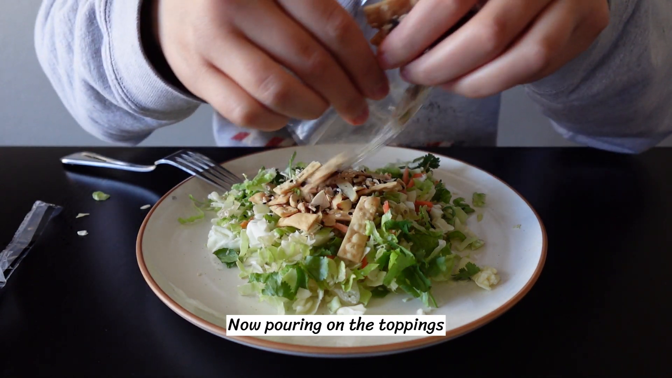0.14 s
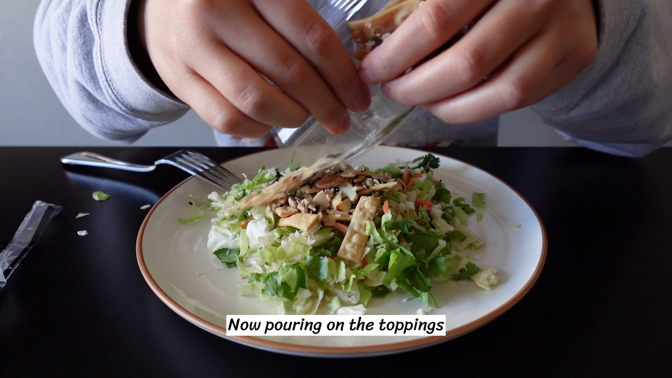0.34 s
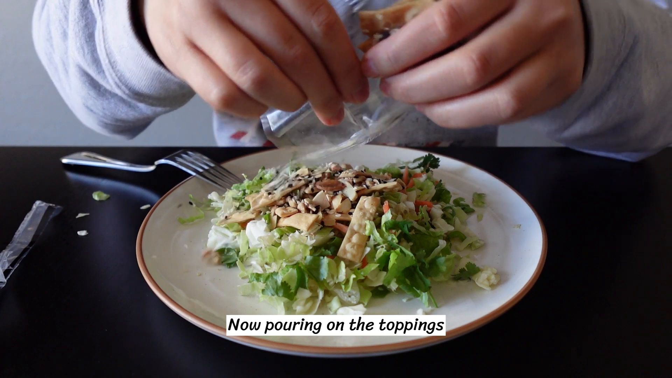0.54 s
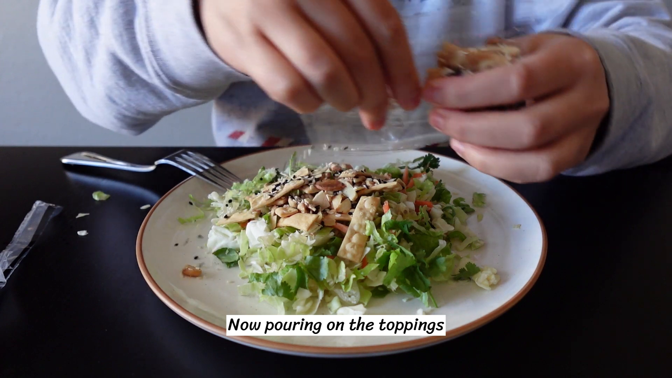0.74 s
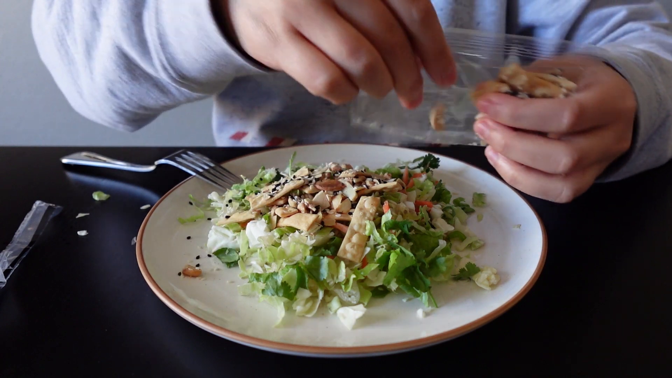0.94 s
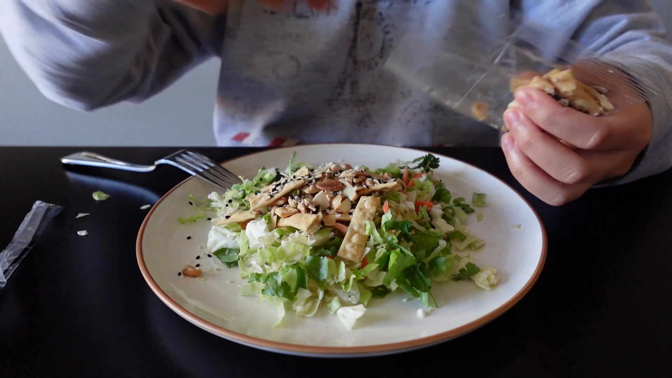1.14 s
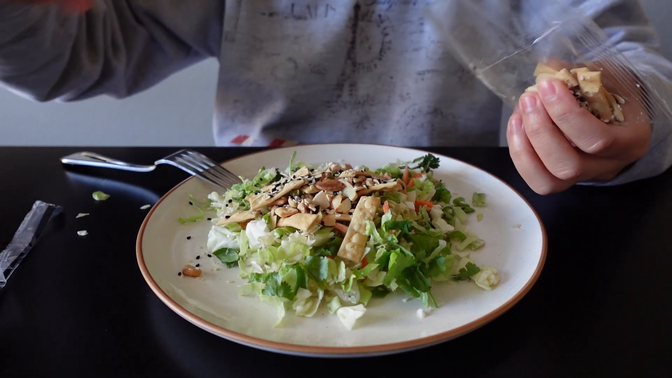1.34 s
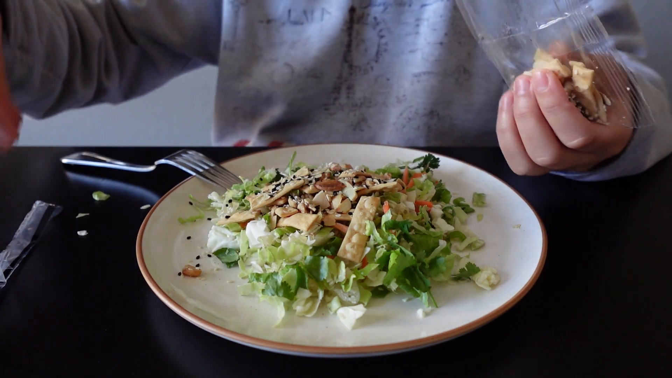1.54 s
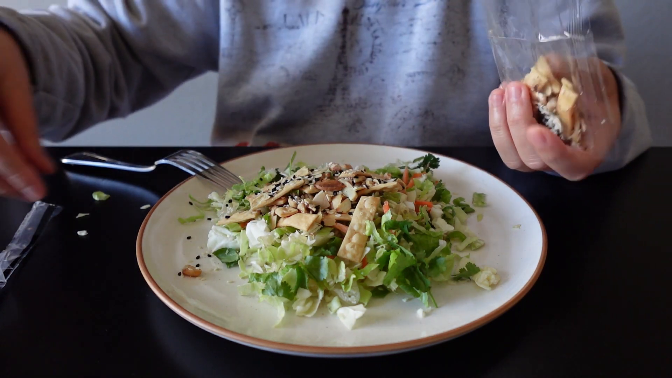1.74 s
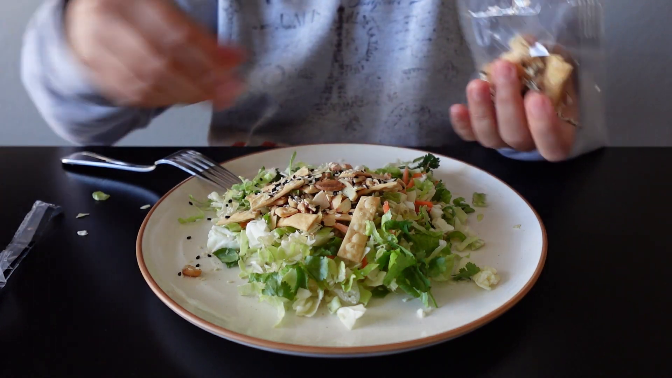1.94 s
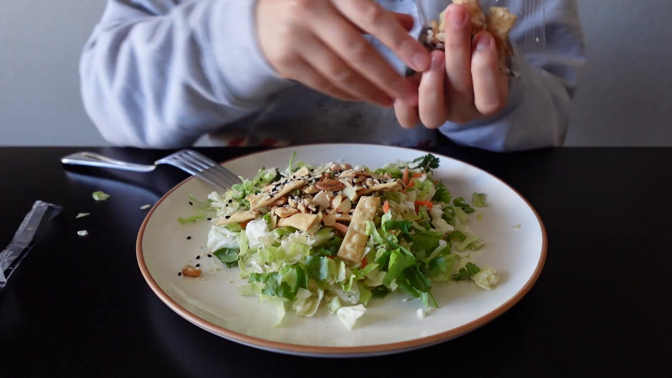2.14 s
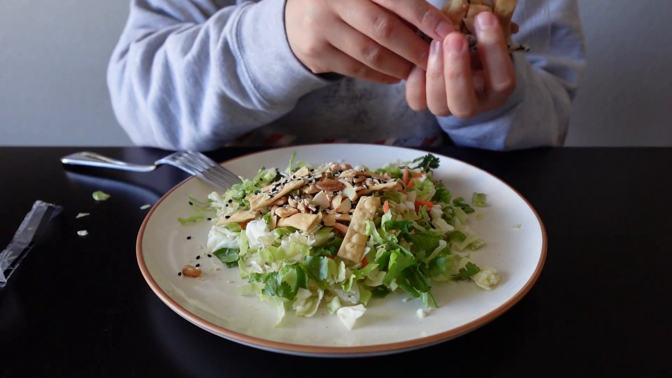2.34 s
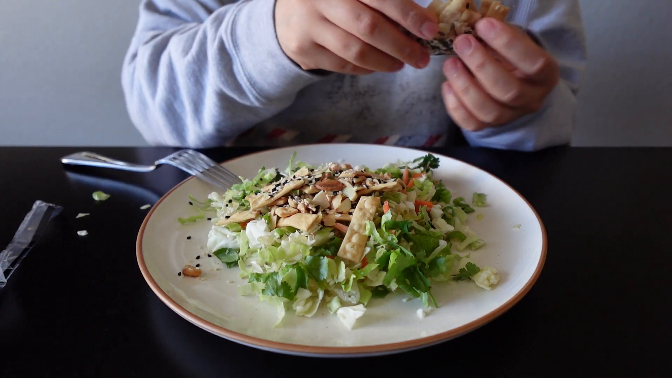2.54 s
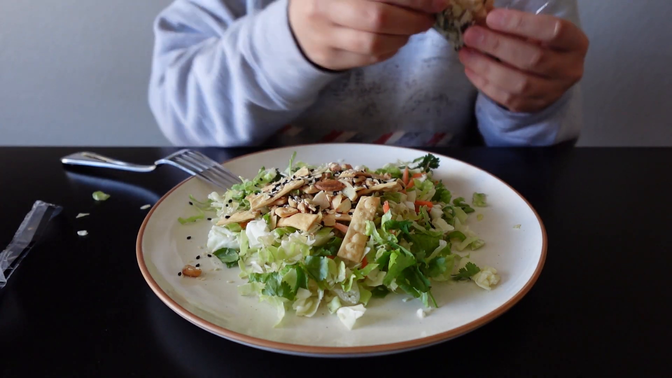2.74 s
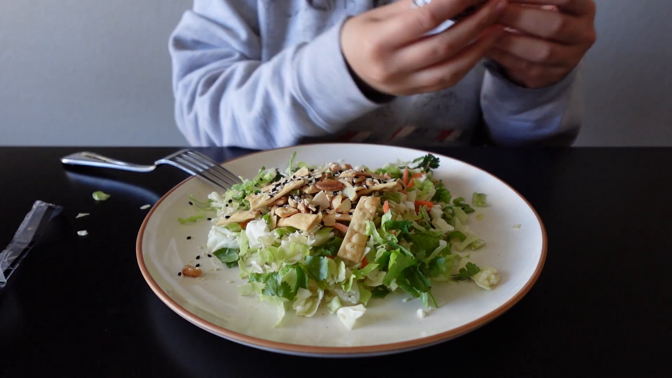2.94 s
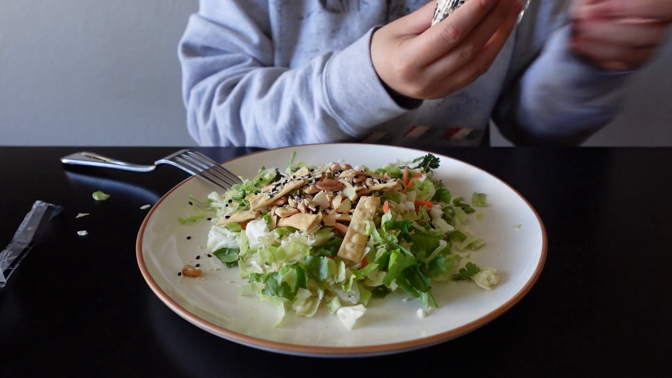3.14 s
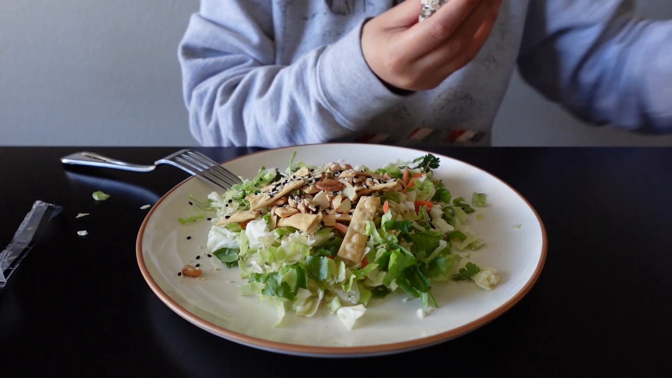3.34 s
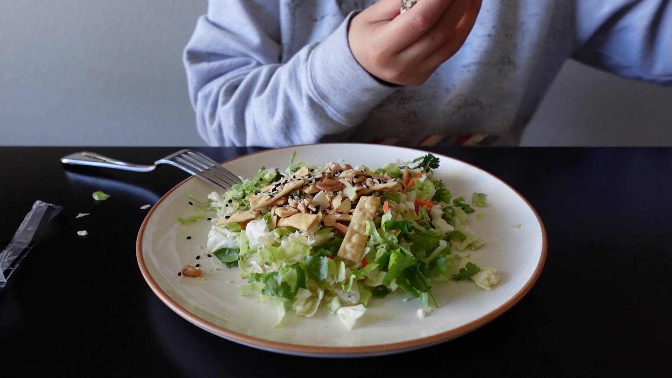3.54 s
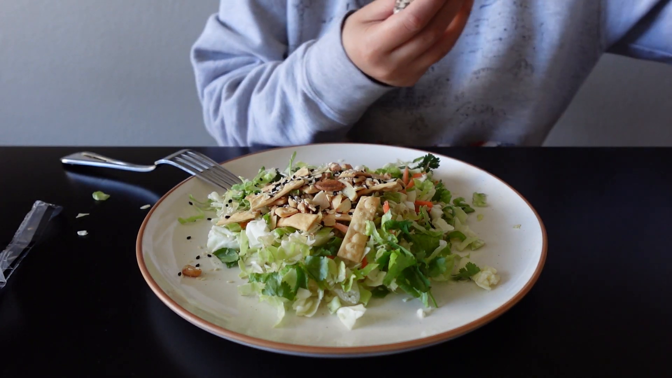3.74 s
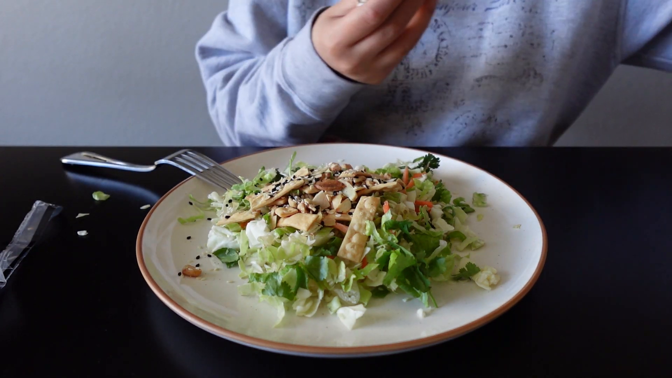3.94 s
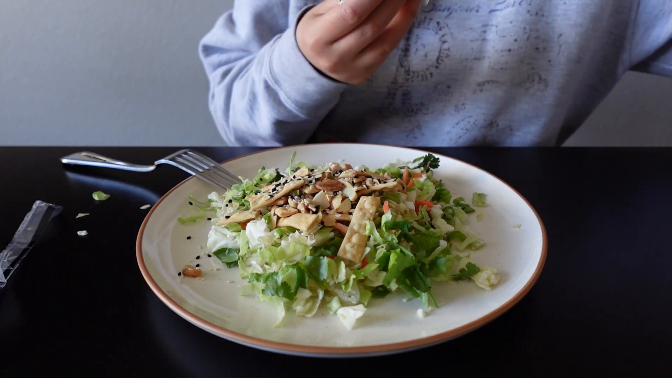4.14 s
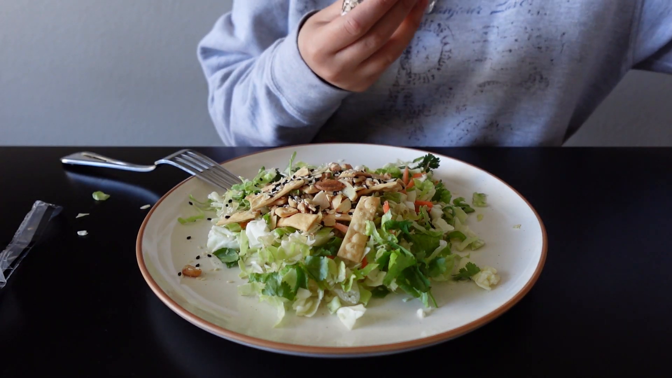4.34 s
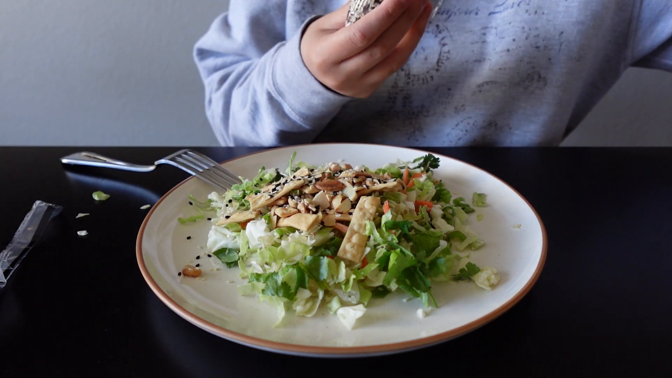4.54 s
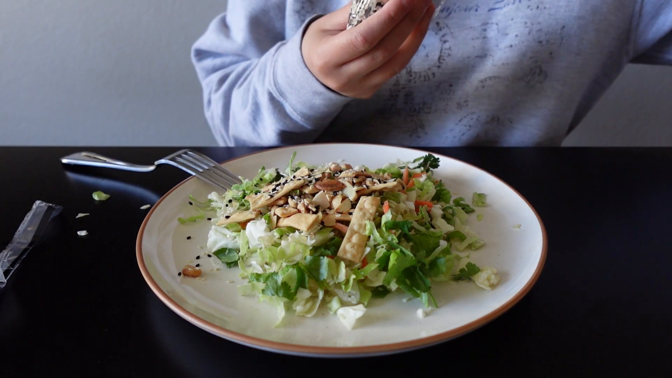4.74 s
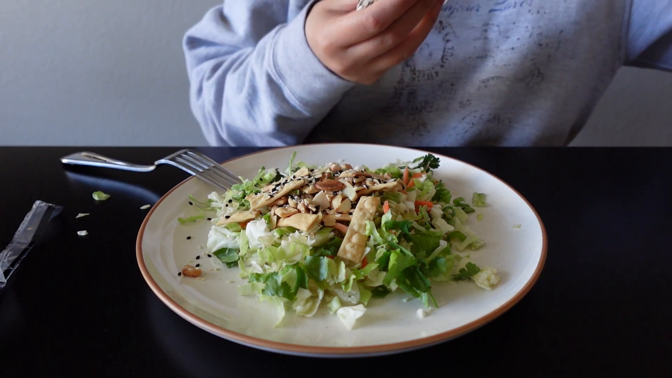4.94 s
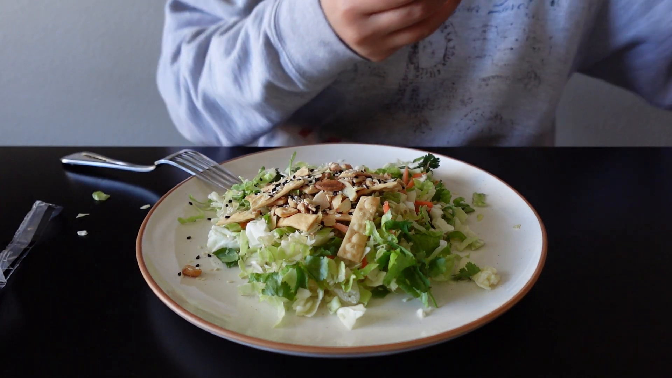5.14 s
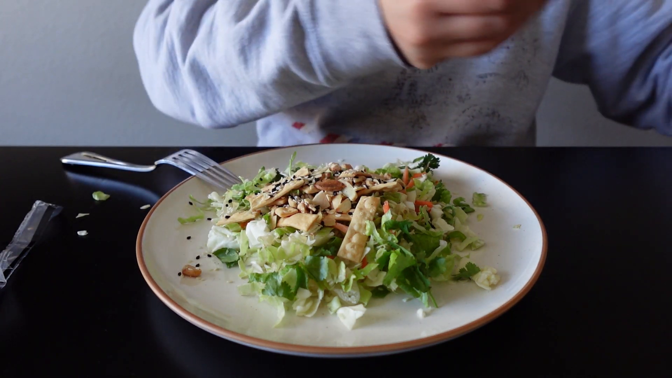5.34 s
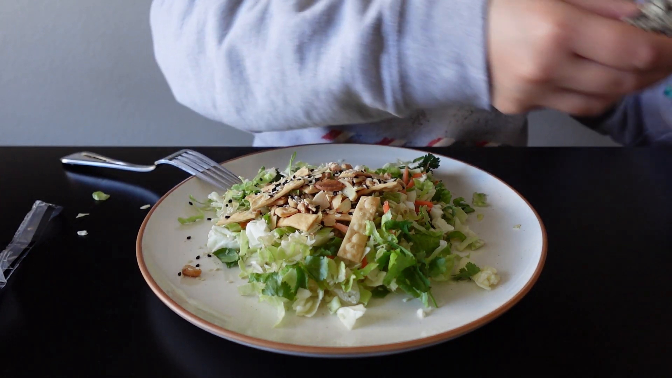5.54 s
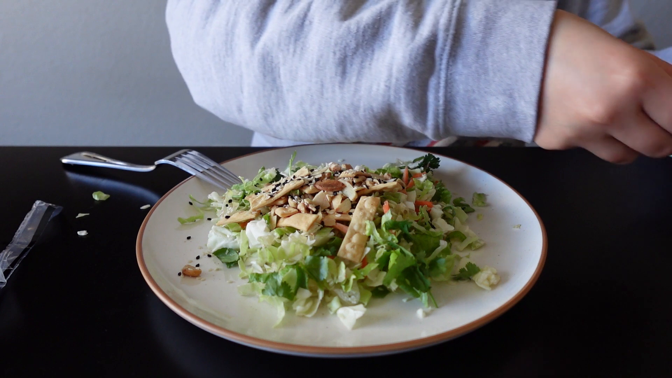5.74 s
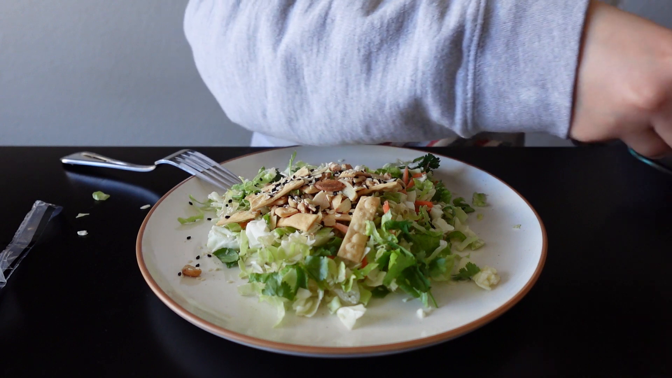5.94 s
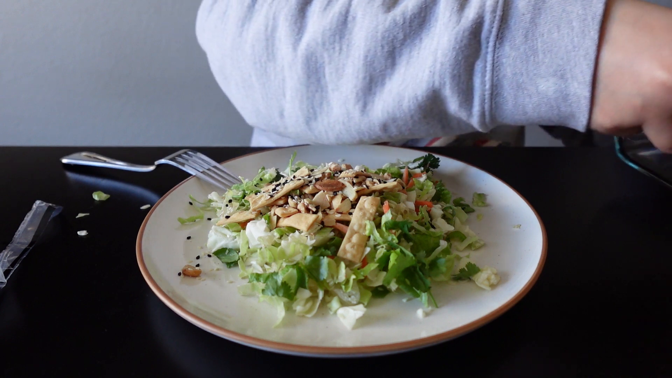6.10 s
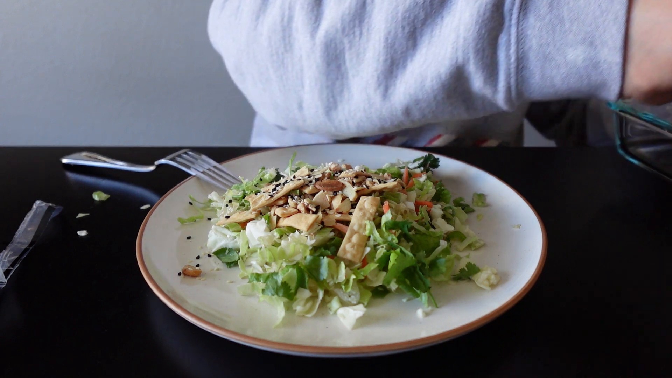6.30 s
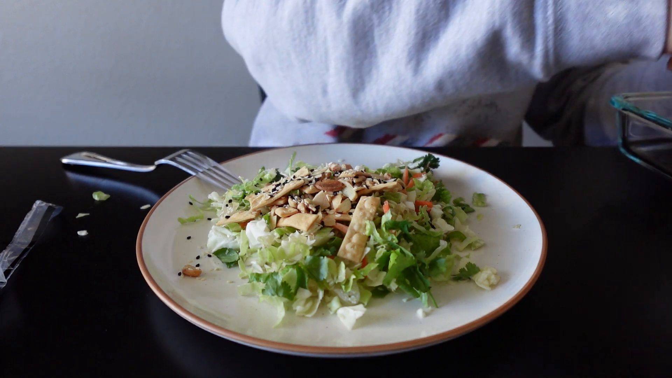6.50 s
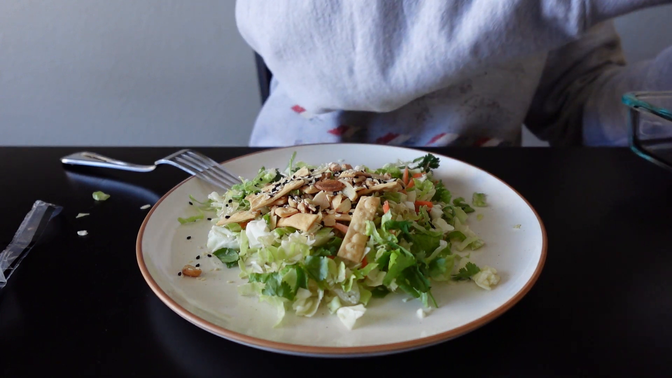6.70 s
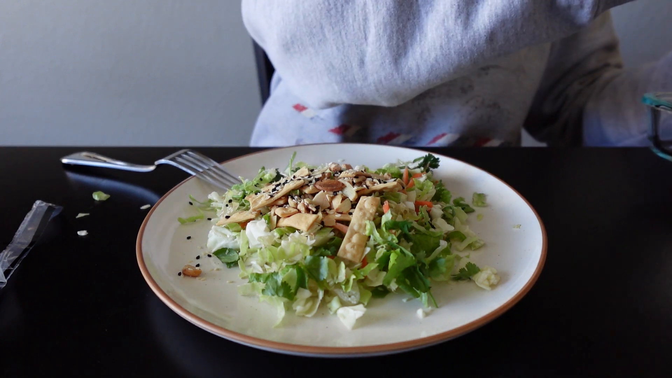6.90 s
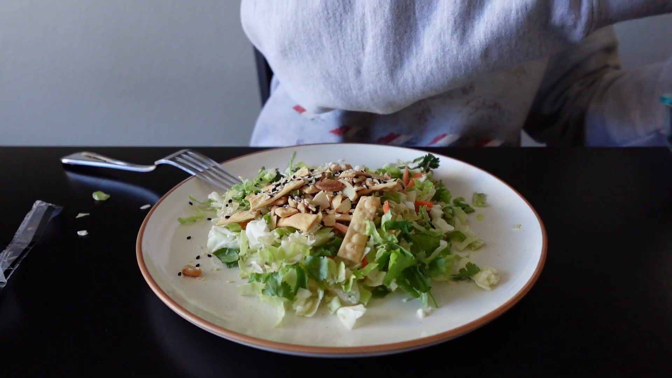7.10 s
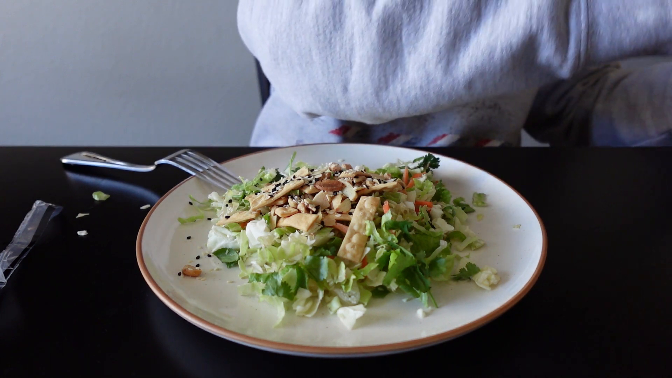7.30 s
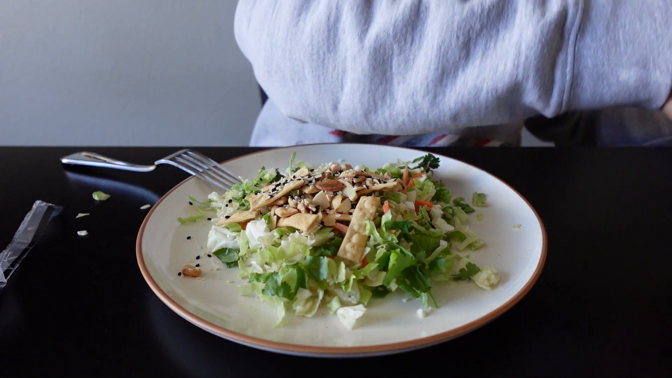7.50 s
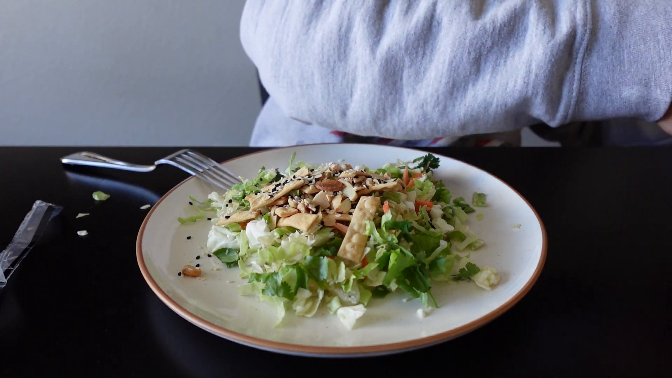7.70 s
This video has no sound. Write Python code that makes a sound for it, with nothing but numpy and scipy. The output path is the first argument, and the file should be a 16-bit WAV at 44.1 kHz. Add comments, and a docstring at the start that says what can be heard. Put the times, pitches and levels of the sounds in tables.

```python
"""In a quiet room, thin plastic food packets are crumpled, shaken and torn open close by.
Loud creases are short noise bursts with a ring; many tiny ones make a bed of crackles, over dull bumps.
In a pause a container is set down with knocks that ring the table top, and small metal or glass things
in it jingle as ringing tones; later one thing is tapped. Room echoes and a steady hush lie behind."""
import sys
import numpy as np
from scipy import signal
from scipy.io import wavfile
from scipy.ndimage import uniform_filter1d

SR = 44100
rng = np.random.default_rng(int(sys.argv[2]) if len(sys.argv) > 2 else 0)


def generate_wav(signal):
    """Clip the signal to [-1, 1] and save it as 16-bit WAV at the path in sys.argv[1]."""
    frames = np.transpose(np.atleast_2d(signal))
    scaled = np.clip(frames, -1, 1) * 32767
    pcm = np.round(scaled).astype(np.int16)
    wavfile.write(sys.argv[1], SR, pcm)


N = 346626  # length in samples
SWAP_S = 3.8  # the second packet is taken up


def gain_of(db):
    """Turns decibels into an amplitude factor."""
    return 10 ** (np.asarray(db) / 20)


def evened(x):
    """Scales each row to an rms of 1."""
    return x / np.sqrt(np.mean(x ** 2, -1, keepdims=True) + 1e-20)


def read(points, hz):
    """Reads a curve at the given frequencies, along a logarithmic frequency axis."""
    f, value = np.transpose(points)
    return np.interp(np.log(hz + 1), np.log(f + 1), value)


def follow(tables):
    """Gives a softened on/off gain, on inside the tables' time spans, and each column at every sample."""
    s, *columns = np.concatenate(tables).T
    t = np.arange(N) / SR
    inside = sum((t >= rows[0][0]) & (t <= rows[-1][0]) for rows in tables)
    on = uniform_filter1d(1. * (inside > 0), 900)
    return on, [np.interp(t, s, column) for column in columns]


def swells(s, db, hold, rise, t60):
    """Gain of each event over time: a rise, a hold and an even fall in dB."""
    since = np.arange(N) / SR - s[:, None]
    fall_db = -60 * np.maximum(since - rise - hold[:, None], 0) / t60
    return np.clip(since / rise, 0, 1) * gain_of(db[:, None] + fall_db)


def random_taps(per_s, spread_db):
    """Single-sample taps at random moments, of very unequal size."""
    return (rng.random(N) < per_s / SR) * gain_of(spread_db * rng.exponential(1, N))


def panned(x, pan_db, lag=0):
    """Makes left and right differ in level and slightly in arrival (lag in samples)."""
    shift = lag / 2 * np.gradient(x, axis=-1)  # adding some slope moves a wave a little in time
    left = (x - shift) * gain_of(pan_db / 2)
    right = (x + shift) * gain_of(-pan_db / 2)
    return np.array([left, right])


def resonate(x, hz, width):
    """A resonance of gain 1: shifts hz down to zero, smooths, and shifts back."""
    turn = np.exp(2j * np.pi * hz * np.arange(x.shape[-1]) / SR)
    r = np.exp(-np.pi * width / SR)
    smooth = signal.lfilter([1 - r], [1, -r], x / turn + 1e-18)
    return 2 * (turn * smooth).real


def band_filter(order, edges_hz, kind, x):
    """Keeps one band of the sound."""
    return signal.sosfilt(signal.butter(order, edges_hz, kind, fs=SR, output="sos"), x)


def split(x, bass_hz=400, low_hz=1500, high_hz=7000):
    """Splits a sound into low, middle and high parts, each at rms 1."""
    low = evened(band_filter(3, [bass_hz, low_hz], "band", x))
    middle = evened(band_filter(3, [low_hz, high_hz], "band", x))
    high = evened(band_filter(3, high_hz, "high", x))
    return low, middle, high


def colour(spectrum):
    """A filter with this spectrum that only responds after its input, as a real object does."""
    share = np.linspace(0, 1, 256)
    # the minimum-phase step halves the dB, so the gain is doubled first
    doubled = gain_of(2 * read(spectrum, share * SR / 2))
    return signal.minimum_phase(signal.firwin2(1023, share, doubled))


# tone colour of the plastic film, one list for each packet: (frequency [Hz], relative level [dB per Hz])
FILM_SPECTRA = [
    [(180, -56.5), (300, -13.5), (439, -31), (675, -19), (1270, -9.5), (2220, 0), (2900, 2), (3420, 2.5),
     (4390, 3), (13800, -5.5), (15700, -3)],
    [(180, -70), (300, -34.5), (601, -18), (653, -13), (1070, -15), (1620, -12.5), (2260, -3), (3200, 5),
     (4040, 3), (5090, 1.5), (10400, -1.5), (15700, -6.5)],
]


def creases(ring_hz, packet, ring_db, cycles, rise=.0001, t60=0.0087, crack_db=12):
    """One row a crease: a crack, a fast run of tiny buckles, and a patch of film that rings a few cycles."""
    t = np.arange(1024) / SR
    draw = rng.standard_normal((len(ring_hz), 2, len(t)))
    pace = np.exp(0.25 * draw[:, 1, :1])  # some creases die away faster
    crack = 1 + gain_of(crack_db) * np.exp(-t / 0.000098)
    shape = gain_of(-60 * t / (t60 * pace)) * crack
    uneven = draw[:, 0] * np.exp(0.72 * draw[:, 1])
    buckles = uneven * (1 - np.exp(-t / rise)) ** 2 * shape
    turns = ring_hz[:, None] * t
    ring = np.sin(2 * np.pi * turns) * gain_of(-20 * turns / cycles)  # falls 20 dB in that many cycles
    ringing = signal.fftconvolve(buckles, ring, axes=1)[:, :len(t)]
    films = np.array([colour(spectrum) for spectrum in FILM_SPECTRA])[packet]
    coloured = signal.fftconvolve(buckles, films, axes=1)[:, :len(t)]
    return evened(coloured) + gain_of(ring_db) * evened(ringing)


# loud single creases: (time [s], peak level of the middle band [dB], ring [Hz],
# treble relative to that peak [dB], fullness relative to that peak [dB])
LOUD_CREASES = [(0.0613, -19.5, 3860, -8, -29), (0.0943, -8, 8700, -2, -43), (0.1037, -9.5, 4030, -7, -27),
                (0.1506, -10.5, 5600, -9, -26), (0.2928, -13.5, 2410, -1, -24),
                (0.4064, -17, 9200, -3, -37), (0.5651, -9.5, 2820, -10, -59), (0.67, -17.5, 4250, -12, -23),
                (0.7101, -19.5, 5640, -7, -22), (0.7304, -11.5, 2280, -4, -24),
                (0.7504, -9, 6430, -3, -24.5), (0.838, -12.5, 2130, -10.5, -31),
                (0.8628, -16, 5530, -3.5, -18), (0.8654, -19.5, 5900, -4, -37),
                (0.9026, -13, 4150, -5.5, -43), (0.9173, -15.5, 3400, -11, -21.5),
                (0.9419, -13, 11400, -1, -31), (0.9763, -16.5, 3670, -3, -27),
                (1.0089, -11, 3160, -7.5, -31), (1.0222, -17.5, 2960, -6, -19),
                (1.0521, -13, 3600, -9, -26), (1.061, -10.5, 8260, -8.5, -25),
                (1.2413, -6.5, 6520, -2, -56), (1.2552, -23, 6360, 3.5, -49), (1.304, -17.5, 7500, -5, -47),
                (1.3503, -20.5, 7260, -6, -41), (1.3693, -22.5, 5300, -5, -43),
                (1.467, -16.5, 5330, -0.5, -50), (1.478, -12, 10900, -3, -50),
                (1.4954, -11.5, 10700, -2.5, -48), (1.5144, -19, 3240, -8, -30),
                (1.5621, -22, 4600, -4, -18.5), (1.5787, -22, 5500, 0, -22), (1.5982, -14, 7400, -4.5, -25),
                (1.6201, -16, 2970, -13, -24), (1.6467, -15, 7730, -10, -23),
                (1.708, -13.5, 7400, -1.5, -20), (1.7829, -21, 6960, -11, -23),
                (1.8212, -27.5, 7900, -1, -28), (1.8428, -23, 4200, -7, -42),
                (1.8965, -23.5, 3200, -7, -46), (1.94, -21, 6330, -11, -44), (2.0227, -20, 7900, -8, -42),
                (2.0582, -14.5, 6060, -4.5, -52), (2.0899, -23.5, 3590, -8, -28),
                (2.1004, -20.5, 4830, -9, -40), (2.1138, -19.5, 4860, -11, -26),
                (2.1316, -16, 7300, -5, -40), (2.1417, -16.5, 7870, -2, -34), (2.1458, -7.5, 3140, -4, -39),
                (2.1669, -14.5, 8100, -5.5, -26), (2.1924, -19, 2140, -28, -35),
                (2.2588, -27.5, 5700, 1, -37), (2.2892, -17.5, 6360, -18, -27),
                (2.3153, -10, 7060, -10, -32), (2.3268, -13.5, 6330, -2.5, -23),
                (2.364, -7.5, 3120, -4.5, -44), (2.38, -7, 2940, -3.5, -30), (2.4023, -14.5, 2620, -3, -29),
                (2.4229, -8.5, 4900, -12, -31), (2.4352, -8, 4500, -2.5, -24.5),
                (2.4909, -6.5, 6640, -2.5, -31), (2.5152, -13, 7300, -9, -33), (2.6379, -17, 5830, -6, -38),
                (2.6948, -18, 6670, 1, -45), (2.7116, -12.5, 1910, -12, -35),
                (2.7314, -13.5, 5900, -4, -32), (2.7482, -17.5, 2050, -6, -28),
                (2.7621, -4, 4500, -10, -27), (2.7763, -7, 3080, -3, -29), (2.7888, -9, 2900, -5, -27),
                (2.8018, -15, 2930, -9, -36), (2.8107, -22, 9900, -2, -20), (2.8744, -13, 2350, -5, -24),
                (2.8884, -17, 11200, -8, -22), (2.9126, -15, 7200, -1.5, -51),
                (2.926, -16.5, 7100, -4, -47), (3.0145, -24, 3120, -13, -26),
                (3.046, -17.5, 3150, -13, -31), (3.1106, -19, 4520, -9.5, -27.5),
                (3.1409, -25, 4650, -2, -26), (3.1642, -29.5, 5850, 1.5, -45),
                (4.0303, -34.5, 6780, -8, -21), (4.113, -36, 7080, -7, -9), (4.147, -37, 3850, -4, -10),
                (4.265, -29.5, 9800, 0.5, -13), (4.349, -31.5, 6930, -3, -16),
                (4.368, -28.5, 2100, -4, -14), (4.7955, -44, 7000, -5, -29), (4.829, -36.5, 5160, -7, -31),
                (5.6532, -33, 2550, -4, -23), (5.7129, -31, 2800, -21, -41),
                (5.7355, -25.5, 2800, -11, -20), (5.7738, -15, 10900, -9.5, -20),
                (5.7849, -16, 2980, -10, -23), (5.7952, -19, 5700, -4, -22), (5.8093, -19.5, 3100, -5, -26),
                (5.8767, -23, 7940, -1, -17), (5.9033, -25, 3050, -3, -29), (5.9354, -19.5, 6730, -8, -19),
                (5.9883, -24.5, 7800, -1, -39), (6.05, -11.5, 2380, -16, -35.5),
                (6.4239, -5.5, 4000, -12, -24.5), (6.6431, -21.5, 10300, -4.5, -33),
                (6.7211, -27.5, 10600, -11, -33), (6.987, -39.5, 3030, -22, -25),
                (7.0058, -32, 3470, -17, -29), (7.0343, -31.5, 3100, -26, -38),
                (7.0607, -29, 2800, -24, -38), (7.0713, -22.5, 2820, -23, -42),
                (7.1101, -18, 2800, -17, -34), (7.1204, -5, 3070, -14, -38), (7.1356, -16, 8850, -1.5, -25),
                (7.1428, -21.5, 5910, -14, -28), (7.1701, -20.5, 3070, -13, -27),
                (7.1818, -17.5, 3070, -15, -30), (7.1931, -21, 4750, -19, -28),
                (7.2476, -18.5, 7000, -8, -34), (7.2604, -14, 3200, -9, -29.5), (7.335, -14, 7520, -9, -38),
                (7.3493, -15.5, 7210, -6.5, -36), (7.3645, -21.5, 3570, -17, -33),
                (7.3764, -21.5, 7630, -4, -35), (7.3981, -19, 8100, -6, -27),
                (7.4077, -25.5, 6800, -2, -39), (7.4215, -20, 6860, -9, -43),
                (7.4784, -24.5, 7500, -5, -31), (7.4876, -23, 5530, -9, -28),
                (7.4982, -22.5, 4950, -20, -21), (7.5042, -18.5, 4870, -13, -31),
                (7.5427, -22, 3660, -39, -26), (7.5555, -21, 3520, -34, -29),
                (7.6231, -25.5, 7600, -6, -30), (7.6384, -28, 5200, -12, -23), (7.645, -28, 5360, -21, -22),
                (7.6804, -24.5, 2900, -15, -27), (7.691, -24, 6730, -14, -26),
                (7.6966, -29.5, 4970, -12, -18), (7.735, -16.5, 4300, -12, -27.5),
                (7.745, -8.5, 3420, -18, -33), (7.7837, -22.5, 3340, -3, -30),
                (7.7941, -8.5, 3620, -10.5, -29.5)]
# how and where the film is held: (time [s], treble [dB], fullness [dB], left-right [dB]); rustle() uses it too
GRIP_CURVE = [(0, 2.5, -18, 0.5), (1.9, 5, -17, -3), (2.5, 5, -13.5, 1.5), (4.0, 7, -28, -9),
              (4.3, 0.5, 5, -6), (4.9, 2, -9.5, -4), (5.68, 2, -13, -4), (5.78, 0.5, -8, -4),
              (6.2, 2, -9.5, -4.5), (6.8, 4, -12, -5), (7.86, 0, -18, -5)]
MIDDLE_DB = -8.5  # taken as the rms of a crease's middle band below its peak


def snaps(scatter_db=1.7, scatter_lag=0.6):
    """The loud creases, each with its own colour, scattered about the place of the hands."""
    s, db, hz, treble_db, full_db = np.transpose(LOUD_CREASES)[:, :, None]
    hands = np.array(GRIP_CURVE)
    place = rng.standard_normal(s.shape)
    pan_db = np.interp(s, hands[:, 0], hands[:, 3]) + scatter_db * place
    packet = 1 * (s[:, 0] > SWAP_S)
    low, middle, high = split(creases(hz[:, 0], packet, ring_db=-7, cycles=11))
    sounds = gain_of(full_db - MIDDLE_DB) * low + middle + gain_of(treble_db - MIDDLE_DB) * high
    sounds *= gain_of(db) / abs(signal.hilbert(middle)).max(1, keepdims=True)
    stereo = panned(sounds, pan_db, scatter_lag * place).swapaxes(0, 1)
    out = np.zeros((2, N + 1024))
    for at, sound in zip(s[:, 0], stereo):
        out[:, round(at * SR):][:, :1024] += sound
    return out[:, :N]


BEFORE_DB, BEFORE_T60_S = -34, .12  # small crackles gather before a loud crease
AFTER_DB, AFTER_T60_S = -26, 0.3  # and die away after it


def fade(power, t60):
    """Lets each burst of power die away by 60 dB of level in t60 seconds."""
    return signal.lfilter([1], [1, -gain_of(-120 / (t60 * SR))], power)  # power is amplitude squared


def aftermath():
    """Gain of the crackles that crowd before and after the loud creases."""
    s, db = np.transpose(LOUD_CREASES)[:2]
    power = np.zeros(N)
    np.add.at(power, np.round(s * SR).astype(int), gain_of(2 * db))
    after = gain_of(2 * AFTER_DB) * fade(power, AFTER_T60_S)
    before = gain_of(2 * BEFORE_DB) * fade(power[::-1], BEFORE_T60_S)[::-1]
    return np.sqrt(after + before)


# effort of the hands, as level of the small crackles, one list for each handling: (time [s], level [dB])
HAND_EFFORT = [
    [(0.0, -36), (0.12, -27), (0.244, -25), (0.286, -25.5), (0.484, -30), (0.678, -34), (0.888, -38),
     (1.058, -45.5), (1.2, -44)],
    [(1.2, -43), (1.298, -47), (1.444, -40), (1.582, -44.5), (1.708, -42.5), (1.846, -40.5), (1.992, -45),
     (2.124, -48.5), (2.25, -48.5)],
    [(2.25, -41.5), (2.54, -37.5), (2.754, -39), (2.862, -37.5), (3.012, -38.5), (3.162, -47.5),
     (3.308, -62.5), (3.55, -75.5), (3.7, -78.5)],
    [(3.95, -72), (4.062, -56), (4.192, -44.5), (4.27, -38), (4.352, -44.5), (4.734, -61), (4.808, -53),
     (4.958, -63), (5.1, -72.5)],
    [(5.55, -67.5), (5.698, -53), (5.836, -38.5), (5.92, -38.5), (6.224, -22), (6.272, -24.5),
     (6.546, -35.5), (6.712, -43.5), (6.814, -53.5), (7.0, -60.5)],
    [(7.0, -56.5), (7.098, -55), (7.252, -44), (7.34, -48.5), (7.474, -46.5), (7.612, -51), (7.86, -56)],
]
# short swishes of film sliding on film: (time [s], level [dB], hold [s])
FILM_SWISHES = [(0.229, -26, .03), (1.028, -35, .02), (2.489, -33, .04), (2.593, -30.5, .04),
                (2.791, -32, .03), (4.025, -48, .04), (4.813, -50.5, .04), (5.649, -52.5, .06),
                (6.304, -24, .05), (6.591, -33.5, .05), (7.481, -37.5, .02)]
SWISH_RISE_S, SWISH_T60_S = 0.012, .1
# air in the packet, one list for each packet: (frequency [Hz], width [Hz], relative level [dB])
AIR_POCKETS = [
    [(2167, 570, 9), (2800, 390, 3.5), (4103, 47, 1)],
    [(950, 100, -7), (3100, 140, 2), (5300, 1200, 28)],
]


def rustle(per_s=1100, spread_db=1.5, clump_db=1.5, scatter_db=1.5, pocket_db=-4, count=20):
    """Countless small creases of very unequal size, coming in clumps, ringing the air in the packet."""
    on, (effort_db,) = follow(HAND_EFFORT)
    swishes = swells(*np.transpose(FILM_SWISHES), SWISH_RISE_S, SWISH_T60_S).sum(0)
    db = 10 * np.log10(gain_of(2 * effort_db) + aftermath() ** 2 + swishes ** 2)
    treble_db, full_db, pan_db = follow([GRIP_CURVE])[1]
    second = np.arange(N) > SWAP_S * SR

    # a stock of crease sounds for each packet
    ring_hz = np.tile(np.geomspace(1900, 11000, count), 2)
    shapes = creases(ring_hz, np.repeat([0, 1], count), ring_db=-9.0, cycles=16.0)

    clumps = evened(uniform_filter1d(uniform_filter1d(rng.standard_normal(N), 500), 500))
    size = gain_of(spread_db * np.minimum(rng.exponential(1, N), 4.5) + clump_db * clumps)
    crowd = gain_of(0.35 * (db + 38))  # harder handling sets off more creases, not only larger ones
    happens = rng.random(N) < per_s * crowd / SR
    hits = panned(size * happens / np.sqrt(crowd), scatter_db * rng.standard_normal(N))
    which = rng.integers(0, count, N) + count * second
    grains = sum(signal.oaconvolve(hits * (which == k), shape[None, :700], axes=1)[:, :N]
                 for k, shape in enumerate(shapes))

    low, middle, high = split(grains)
    first_air, second_air = [evened(sum(gain_of(d) * resonate(grains, f, w) for f, w, d in modes))
                             for modes in AIR_POCKETS]
    air = np.where(second, second_air, first_air)
    sound = gain_of(full_db) * low + middle + gain_of(treble_db) * high + gain_of(pocket_db) * air
    total = np.sqrt(1 + sum(gain_of(2 * d) for d in (full_db, treble_db, pocket_db)))
    return on * sound / total * panned(gain_of(db), pan_db)


# dull bumps of hands and contents: (time [s], level [dB], hold [s])
DULL_BUMPS = [(0.057, -56, 0.18), (0.72, -60.5, 0.036), (1, -54.5, 0.011), (1.583, -64.5, 0.13),
              (2.287, -65.5, 0.26), (2.75, -56.5, .03), (5.738, -61, 0.026), (6.2, -60, 0.055),
              (7.14, -62.5, 0.039), (7.476, -65, .03), (7.717, -68, 0.025)]
FUMBLE_RISE_S, FUMBLE_T60_S = 0.01, 0.9


def fumble(per_s=1500, spread_db=2.0):
    """Soft low bumps: dense random pushes heard through a dull band."""
    level = swells(*np.transpose(DULL_BUMPS), FUMBLE_RISE_S, FUMBLE_T60_S).sum(0)
    pushes = random_taps(per_s, spread_db) * rng.standard_normal(N)
    return level * evened(band_filter(2, [170, 520], "band", pushes))


# ringing tones of the table top: (frequency [Hz], width [Hz], relative level [dB])
TABLE_MODES = [(122, 16, -11), (200, 30, -14), (294, 16, 0), (325, 20, -5), (368, 25, -8), (496, 30, -7),
               (612, 40, -11), (800, 45, -10), (935, 50, -15), (1060, 70, -15), (1400, 200, -21)]


def table_body(x):
    """The table top rings at its own tones, with alternating sign."""
    return evened(sum((-1) ** k * gain_of(d) * resonate(x, f, w) for k, (f, w, d) in enumerate(TABLE_MODES)))


def hard_contact(x):
    """The hard edge of the contact: one broad band around 870 Hz."""
    return evened(resonate(resonate(x, 870, 1350), 870, 1350))


# the container slides and rocks to rest: (time [s], level [dB])
SCRAPE_LEVEL = [(4.0, -70), (4.08, -62), (4.11, -35), (4.16, -44), (4.2, -25.5), (4.25, -34.5), (4.33, -41),
                (4.65, -71), (4.75, -67)]
# the container meets the table: (time [s], peak level [dB], hardness [dB])
TABLE_KNOCKS = [(4.087, -30.5, -18.5), (4.097, -27.5, -16.5), (4.17, -16.5, -16.5), (4.212, -14, -14.5),
                (4.239, -22, -16)]


def container():
    """Knocks and uneven scraping shake the table top, which radiates no deep bass."""
    on, (db,) = follow([SCRAPE_LEVEL])
    unevenness = evened(uniform_filter1d(rng.standard_normal(N), 300))
    scrape = rng.standard_normal(N) * gain_of(3.7 * unevenness)
    out = on * gain_of(db) * (table_body(scrape) + gain_of(-12.5) * hard_contact(scrape))
    t = np.arange(4000) / SR
    for s, peak_db, hard_db in TABLE_KNOCKS:
        blow = rng.standard_normal(len(t)) * np.exp(-t / 0.0058)
        thud = table_body(blow) + gain_of(hard_db) * hard_contact(blow)
        out[round(s * SR):][:len(t)] += gain_of(peak_db) * thud / abs(thud).max()
    return panned(band_filter(4, 100, "high", out), -1.7)


# ringing tones of the small things: (frequency [Hz], width [Hz], relative level [dB])
JINGLE_MODES = [(2035, 20, -6), (3010, 20, -8), (3290, 16, -7), (3480, 22, -2), (5165, 22, -3),
                (6944, 24, -8), (7272, 22, -10), (8812, 26, -11)]
# jolts that rattle the things in the container: (time [s], level [dB], brightness [dB])
JOLTS = [(4.36, -49, -11), (4.44, -58.5, -7), (4.48, -63, -6), (4.585, -55.5, -1), (4.63, -68, 0),
         (4.7, -80, -2), (4.81, -65, 5.5)]
RATTLE_RISE_S, RATTLE_T60_S = 0.024, 0.73


def jingle(per_s=200, spread_db=1.5):
    """Small hard things tap each other and ring; every tap favours other modes."""
    s, jolt_db, bright_db = np.transpose(JOLTS)
    jolts = swells(s, jolt_db, 0 * s, RATTLE_RISE_S, RATTLE_T60_S)
    deep_level, bright_level = jolts.sum(0), gain_of(bright_db) @ jolts
    hits = random_taps(per_s, spread_db)
    out = np.zeros(N)
    for hz, width, db in JINGLE_MODES:
        force = hits * rng.standard_normal(N)
        level = gain_of(db) * (bright_level if hz > 4000 else deep_level)
        out += resonate(level * force, hz, width) / resonate(force, hz, width).std()
    return panned(out, -8.5)


# three tones of one small thing: (frequency [Hz], time to fall 60 dB [s])
TAP_MODES = [(2035, 0.11), (3289, 0.33), (4735, 0.092)]
# later, this thing alone is tapped: (time [s], level of first, second and third tone [dB])
LONE_TAPS = [(6.35, -39, -30, -51), (6.831, -54, -81, -58), (6.852, -60, -79, -57),
             (6.877, -46.5, -50, -47.5), (6.896, -59, -60, -78)]


def taps():
    """Each tap rings the same three modes, which die away evenly."""
    t = np.arange(SR // 4) / SR
    out = np.zeros(N)
    for s, *levels_db in LONE_TAPS:
        for (hz, t60), db in zip(TAP_MODES, levels_db):
            out[round(s * SR):][:len(t)] += gain_of(db - 60 * t / t60) * np.sin(2 * np.pi * hz * t)
    return panned(out, -5)


def partly_alike(left, other, same):
    """Builds a right side that shares the given part of the left one."""
    return np.array([left, same * left + np.sqrt(1 - same ** 2) * other])


# how the room's echoes die: (frequency [Hz], time to fall 60 dB [s], left-right likeness [0 to 1])
ROOM_WALLS = [(200, 0.079, 0.84), (992, 0.66, 0.99), (4104, 0.51, 0.7), (12000, 0.28, 1)]


def room(x):
    """Echoes of random sign; dying speed and left-right likeness differ from band to band."""
    echoes = np.zeros((2, SR // 2))
    start = np.arange(420, SR // 2 - 20, 20)  # one echo in every 20 samples
    at = start + rng.integers(0, 20, (2, len(start)))
    np.put_along_axis(echoes, at, rng.choice([-1., 1.], at.shape), 1)
    hz, t, (left, other) = signal.stft(echoes, SR, nperseg=256)
    walls = np.array(ROOM_WALLS)
    t60 = read(walls[:, [0, 1]], hz)[:, None]
    same = np.clip(read(walls[:, [0, 2]], hz)[:, None], 0, 1)
    z = partly_alike(left, other, same) * gain_of(-60 * t / t60)
    tail = signal.istft(z, SR, nperseg=256)[1]
    return signal.fftconvolve(x, tail / np.linalg.norm(tail[0]), axes=1)[:, :N]


# tone colour of the hush: (frequency [Hz], relative level [dB per Hz])
HUSH_SPECTRUM = [(15, -63), (25, -33), (43, -27.5), (86, -26.5), (113, -12.5), (152, -22.5), (194, 1.5),
                 (261, -20), (299, -8), (333, -12), (435, -16), (618, -16), (1820, -22), (1970, -23.5),
                 (15700, -33)]
HUSH_DB = -65  # rms level
# how alike the hush is left and right: (frequency [Hz], left-right likeness [0 to 1])
HUSH_LIKENESS = [(60, 1), (240, 0.28), (950, 0.075), (3770, 0.2), (15000, 0.26)]


def hush():
    """Steady room tone and microphone hiss: shaped noise with slightly uneven patches."""
    frames, hz = N // 256 + 5, np.fft.rfftfreq(1024, 1 / SR)
    a, b, c, d, patches = rng.standard_normal((frames, 513, 5)).T
    patches = evened(uniform_filter1d(uniform_filter1d(patches, 12, 0), 14, 1))
    same = np.clip(read(HUSH_LIKENESS, hz), -1, 1)[:, None]
    z = partly_alike(a + 1j * b, c + 1j * d, same)
    z *= gain_of(read(HUSH_SPECTRUM, hz)[:, None] + 2.3 * patches)
    noise = signal.istft(z, nperseg=1024, noverlap=768)[1][:, :N]
    return gain_of(HUSH_DB) * evened(noise)


def scene():
    """Near film, farther table, the room around both."""
    film = snaps() + rustle() + fumble()
    table = container() + jingle() + taps()
    echoes = room(gain_of(-15.5) * film + gain_of(-9) * table)
    return film + table + echoes + hush()


EDGE_HZ = 16000  # upper limit of the sound


def record(dry):
    """The converter clips at full scale; then the band limit removes the highest treble."""
    edge = signal.firwin(511, EDGE_HZ, window=("kaiser", 9), fs=SR)
    limited = signal.oaconvolve(np.clip(dry, -1, 1), edge[None], "same")
    return np.clip(limited, -1, 1)


dry = scene()
out = record(dry)
generate_wav(out)
```